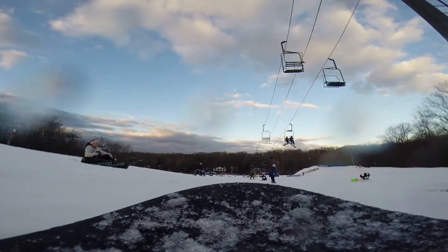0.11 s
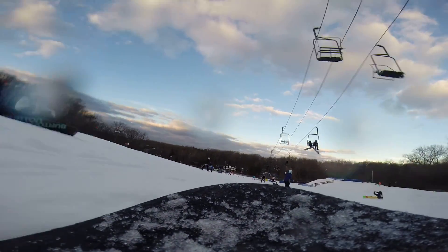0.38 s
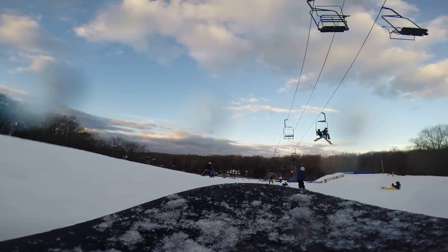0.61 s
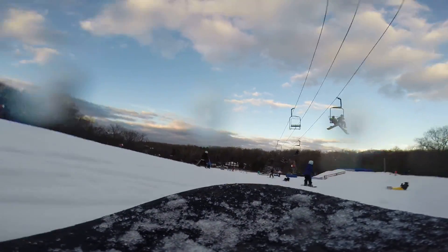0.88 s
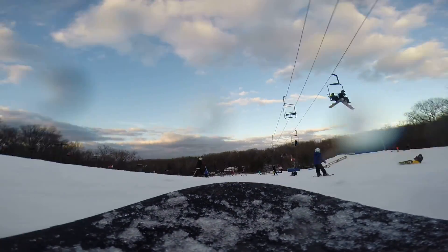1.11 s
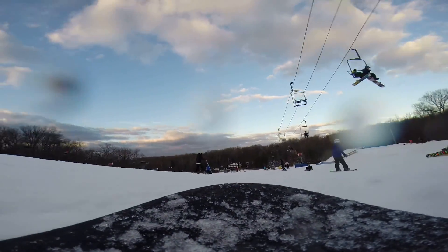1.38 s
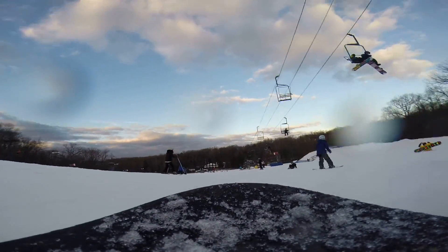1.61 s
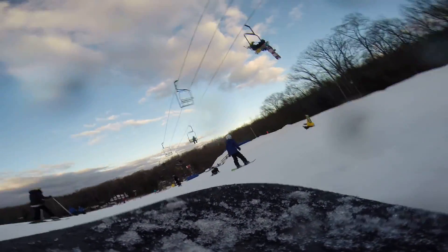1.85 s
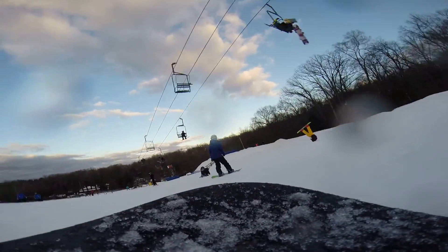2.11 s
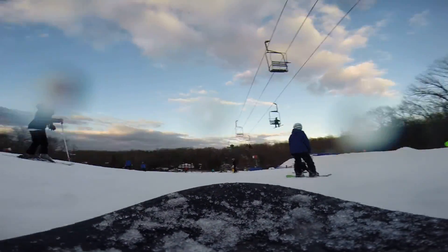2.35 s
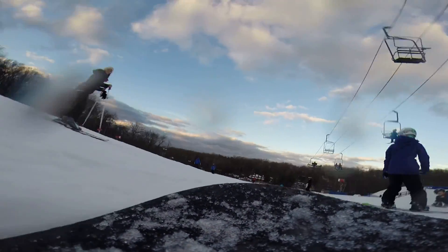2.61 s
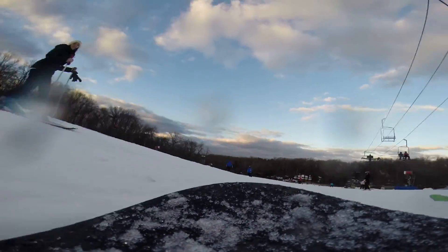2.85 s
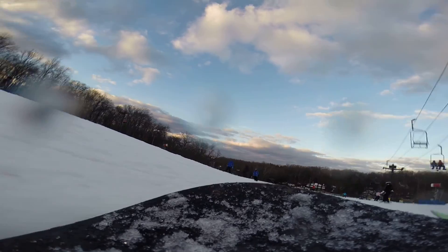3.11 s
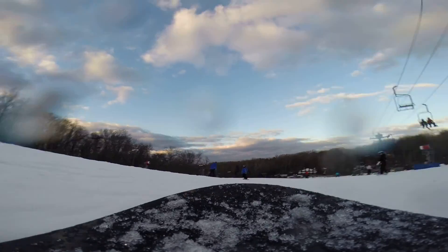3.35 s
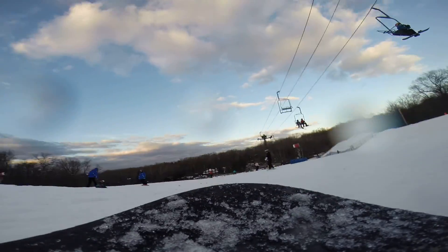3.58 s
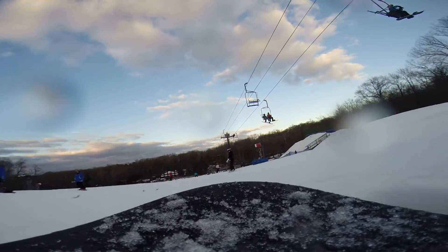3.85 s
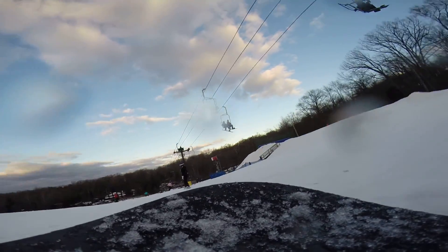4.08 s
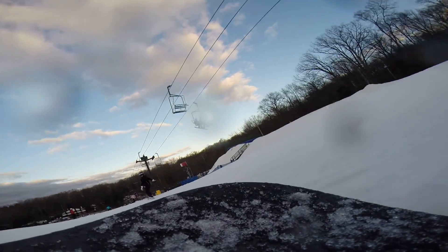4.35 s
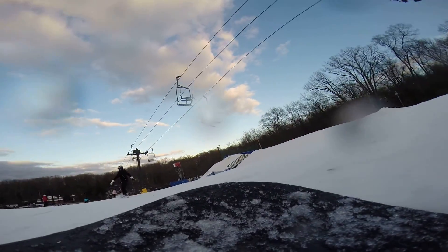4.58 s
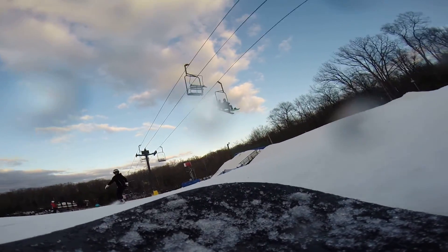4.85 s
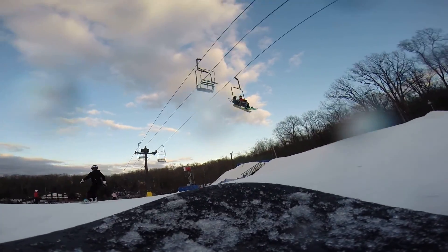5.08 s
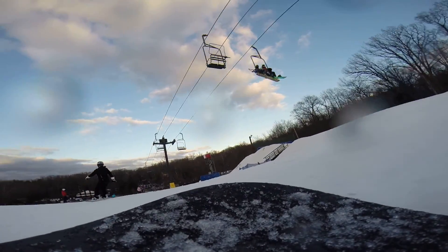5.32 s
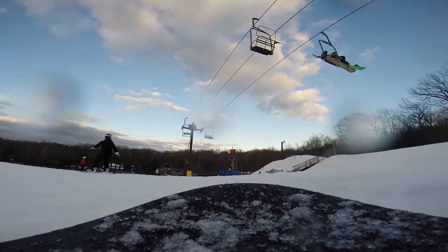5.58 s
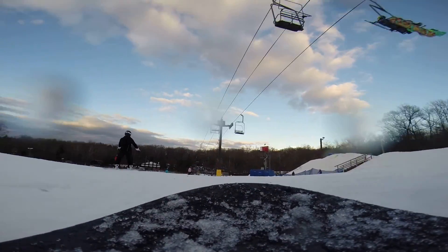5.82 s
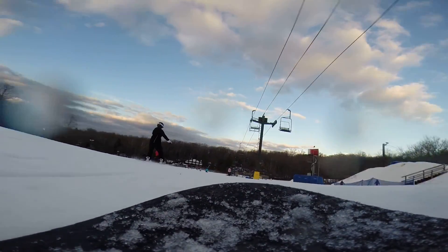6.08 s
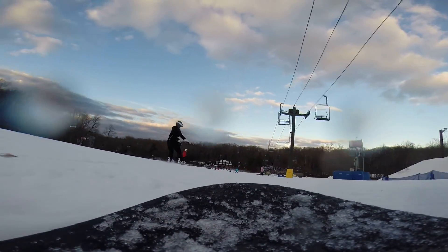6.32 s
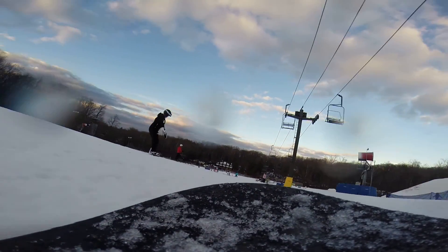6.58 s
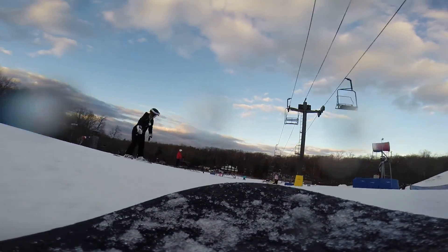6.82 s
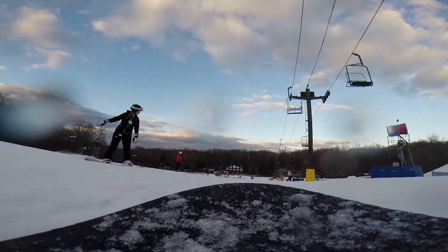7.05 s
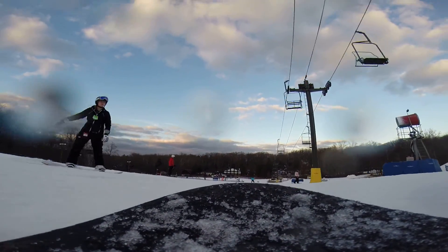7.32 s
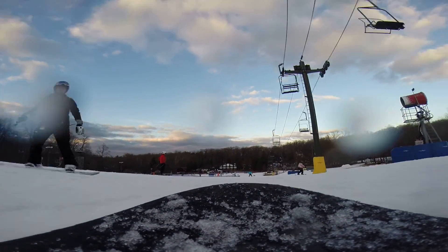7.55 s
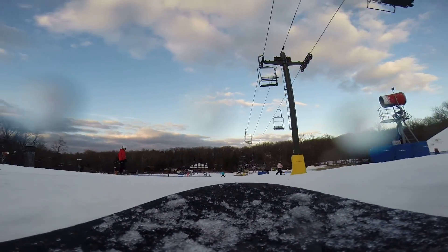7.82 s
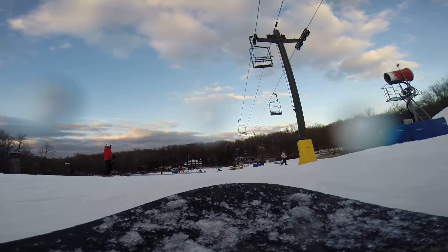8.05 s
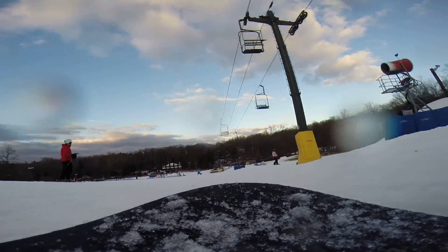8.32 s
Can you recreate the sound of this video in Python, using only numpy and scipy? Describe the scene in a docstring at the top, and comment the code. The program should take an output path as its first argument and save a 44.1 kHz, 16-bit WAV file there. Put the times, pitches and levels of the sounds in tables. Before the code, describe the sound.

Harsh, crunchy sliding on hard snow heard from the deck, fluttering constantly, with sharp ridge bumps and a low shuddering hum.

```python
"""A board slides over packed snow, heard by a small camera in a closed case fixed on its deck.
Dense random grains, coloured by the resonances of deck and case, make the scrape and a coarser low roar.
A bending mode hums near 100 Hz under noise and kicks; swelling sines are ridges and lumps, clicks are ice chips.
When the base lifts, the scrape sinks and its treble usually shifts, at times going dull.
Low noise gusts as wind, and a steady microphone hiss lies under it all."""
import sys
import numpy as np
from scipy import signal
from scipy.io import wavfile
from scipy.ndimage import uniform_filter1d

SR = 44100
rng = np.random.default_rng(int(sys.argv[2]) if len(sys.argv) > 2 else 0)


def transcribe(signal):
    """Save signal, clipped to [-1, 1], as a 16-bit WAV file at the path in sys.argv[1]."""
    frames = np.atleast_2d(signal).T
    limited = np.clip(frames, -1, 1)
    pcm = np.round(limited * 32767).astype(np.int16)
    wavfile.write(sys.argv[1], SR, pcm)


def how_loud(loudness_db):
    """Turn decibels into a plain amplitude multiplier (0 dB gives 1, 20 dB gives 10)."""
    steps = np.asarray(loudness_db, float) / 20
    return 10 ** steps


N = 371763  # samples

# Spectrum of the scrape before the body rings: f/Hz, relative density/dB per Hz
SCRAPE_SPECTRUM = [(650, -70), (1100, -17.5), (1500, -8.5), (2140, 1.5), (3520, -13.5), (5660, -24),
                   (6250, -23), (7630, -33), (11800, -46.5), (15500, -47)]
# Spectrum of the low roar before the body rings: f/Hz, relative density/dB per Hz
ROAR_SPECTRUM = [(76, -18), (130, -2.5), (298, -11), (491, -12.5), (584, -19), (682, -14), (780, -18.5),
                 (910, -11.5), (1090, -16.5), (1300, -6.5), (1690, -34), (2860, -120)]
# Resonances (+) and cancellations (-) of deck and case: f/Hz, width/Hz, gain/dB
BODY_MODES = [(203, 105, 4), (485, 210, 2.5), (630, 60, 0), (676, 53, 3.5), (788, 66, -4), (960, 190, 5),
              (1100, 294, -5.5), (1530, 338, 11.5), (1830, 100, -1.5), (2100, 525, 5.5), (2355, 80, -6.5),
              (3095, 114, -7), (3480, 200, -2), (4120, 94, 3.5), (4620, 670, -2), (5640, 230, -9.5),
              (5950, 1800, 4), (7280, 280, -4.5), (7830, 480, -10.5), (8500, 700, 2.5), (10420, 390, -9),
              (11630, 1550, 8), (13900, 900, 0), (15100, 900, -5)]
# The ride: t/s, bite of the edge as treble gain/dB, lean of the board as gain of the lower deck modes/dB
RIDE = [(0.0, 5.5, 3.5), (0.17, -2.5, -1.5), (0.38, 3, 2), (0.7, 3, -0.5), (0.92, 6.5, -0.5),
        (1.4, 4.5, -1), (1.8, 4.5, 3.5), (2.12, -4, 3), (2.33, 8.5, -4), (2.6, 0, 0), (3.3, 1, 2),
        (3.66, 5, 2.5), (4.0, 0, 4), (4.3, 2, 4.5), (4.72, -3.5, 8), (5.05, -1.5, 4.5), (5.2, 4.5, -1),
        (5.3, 1, 4), (5.47, -1.5, 7.5), (5.55, 8, 4), (5.66, 5.5, -1), (6.05, 5.5, -4.5), (6.55, 0.5, 2),
        (6.8, 1.5, -1.5), (7.3, 1, 3), (7.64, 7.5, -5), (7.75, 2.5, -7), (7.96, 3.5, 4), (8.25, 0, 5),
        (8.43, -4, 2)]
# The base comes off the snow: t of least contact/s, loss/dB, fading/s, return/s, further treble loss/dB
LIFTS = [(0.175, 3.5, .01, 0.19, -4.5), (0.47, 1.5, 0.041, 0.022, -2), (0.74, 3.5, 0.028, 0.026, 3),
         (0.84, 4, .02, 0.034, 0), (1.04, 6, 0.086, 0.037, 21), (1.3, 4, 0.065, 0.057, -1.5),
         (1.45, 2, 0.014, 0.068, 5), (1.56, 4.5, 0.027, 0.035, -2), (1.68, 3.5, 0.057, 0.025, -1.5),
         (2.18, 5, 0.043, .03, -6), (2.26, 5, 0.035, 0.1, -1), (2.62, 5.5, 0.027, 0.038, -4),
         (2.752, 3.5, 0.0066, .008, 0), (2.983, 3.5, 0.011, 0.0088, 1), (5.384, 5, 0.014, 0.0091, 0),
         (3.538, 11.5, 0.071, 0.025, 6), (3.85, 4.5, 0.042, 0.015, 2), (4.02, 2.5, 0.014, 0.13, -3),
         (4.165, 4.5, 0.01, 0.022, -5), (5.04, 4, 0.024, 0.04, 3), (5.11, 1.5, 0.014, 0.025, 0),
         (5.55, 5, 0.08, 0.051, 1), (5.85, 6, 0.0095, 0.1, -2.5), (6.56, 3.5, 0.028, 0.14, 0),
         (7.05, 2.5, 0.056, 0.034, -4), (7.725, 1.5, 0.02, 0.013, -1), (7.501, 9.5, 0.077, 0.028, 2),
         (7.83, 6, 0.04, 0.011, 10), (7.89, 2.5, 0.014, 0.057, -5), (8.03, 1.5, 0.012, 0.013, 4),
         (8.08, 6.5, 0.02, 0.03, 0), (8.14, 5.5, 0.022, 0.022, -1), (8.225, 11.5, 0.0072, 0.0082, -1),
         (8.272, 4, 0.0083, 0.051, 5), (8.375, 6, 0.015, .03, -2)]
# The base digs in (a negative gain eases off): t/s, length/s, gain/dB
DIGS = [(0.103, 0.023, 1), (0.525, 0.019, 4.5), (0.636, 0.037, -1.5), (0.88, 0.076, 2), (1.166, 0.019, 7.5),
        (1.21, 0.017, 0.5), (1.408, 0.051, 1.5), (1.515, 0.033, 7), (1.62, 0.033, 2.5), (2.297, 0.032, 4),
        (2.359, 0.021, 4.5), (2.495, 0.021, 4.5), (2.577, 0.0093, 9), (2.891, 0.028, 6), (3.088, 0.048, 2),
        (3.336, 0.027, 4), (3.576, 0.026, 3), (3.723, .04, 3.5), (3.99, .04, 3), (4.253, 0.043, 3.5),
        (4.694, .04, -0.5), (5.46, .03, -3), (5.638, 0.045, 2), (5.735, 0.025, 8), (5.83, 0.041, 6.5),
        (5.96, 0.022, 4), (6.047, .04, 3), (6.52, 0.027, 1.5), (6.834, 0.071, 3), (7.102, 0.037, 4.5),
        (7.616, 0.039, 1), (8.003, 0.018, 2.5), (8.116, 0.014, 0), (8.177, 0.017, 2), (8.212, 0.018, 5)]
# Rough patches that shake the deck: t/s, length/s, flex hum gain/dB, low roar gain/dB
ROUGH_PATCHES = [(0.0, 0.032, 17, -4), (0.147, 0.044, -3, 1), (0.155, 0.015, -2, 5.5),
                 (0.413, 0.16, 5, 0.5), (0.59, 0.1, 12, -3), (1.112, 0.073, -6, -0.5),
                 (1.413, 0.048, 11, 4), (1.504, 0.041, 10.5, 5), (1.662, 0.066, 9, -9),
                 (1.857, 0.071, 9, 6), (1.971, 0.056, 17.5, 1.5), (2.122, 0.23, 9.5, 4.5),
                 (2.224, 0.015, -2, 5), (2.252, 0.26, 6.5, -1.5), (2.417, 0.09, 12.5, 1.5),
                 (2.572, .06, 4, 2), (2.75, 0.23, 4, 1), (2.767, .02, 8, -2), (3.014, 0.33, 4, 1.5),
                 (3.187, 0.2, 6, 2), (3.342, 0.058, -5, 4), (3.586, 0.33, 9.5, -0.5), (3.945, 0.44, 1.5, 3),
                 (4.108, 0.12, 13, -1), (4.264, 0.16, 7.5, 4), (4.545, 0.057, -17, 5.5),
                 (4.634, 0.27, 8.5, 1.5), (4.933, 0.1, 8, 5.5), (5.18, 0.26, 10, 2.5), (5.306, 0.081, 1, 3),
                 (5.466, 0.28, 9, 1), (5.653, 0.045, 3, 1), (5.726, 0.055, 12, -1), (5.864, 0.063, 9, -0.5),
                 (5.945, 0.14, 1.5, -5), (6.083, 0.071, 12.5, 2), (6.237, 0.11, 6, 0.5),
                 (6.375, 0.17, 4, 4), (6.494, 0.078, 2, 4.5), (6.694, 0.15, 6, 2.5),
                 (6.862, 0.053, 13, 4.5), (6.973, 0.04, -2, 6), (7.296, 0.12, 9.5, 3),
                 (7.45, 0.16, -4, -3.5), (7.61, 0.2, 13, 2), (7.794, 0.12, 8.5, 6), (7.927, 0.061, 12, -5),
                 (8.115, 0.026, -5, 3), (8.29, 0.31, 9.5, 2.5)]
# Bumps that kick the bending mode: t/s, kick/dB
BUMPS = [(0.425, -20.5), (0.571, -10), (0.819, -21), (1.106, -19), (1.728, -26), (1.819, -15), (1.895, -17),
         (2.03, -12.5), (2.272, -12), (2.545, -20), (2.76, -15), (2.966, -17), (3.195, -10.5), (3.365, -16),
         (3.575, -14), (4.004, -15), (4.904, -17), (5.309, -10.5), (5.451, -15), (5.701, -13), (6.467, -14),
         (6.852, -20), (6.969, -17), (7.298, -14), (7.587, -21), (7.744, -13), (7.907, -24), (8.11, -22)]
# Wind gusts: t/s, length/s, gain over the calm/dB
GUSTS = [(0.15, 0.22, 5), (0.655, 0.99, 9.5), (1.144, 0.12, 10), (1.47, 0.27, 12), (1.948, 0.33, 17),
         (2.596, 0.4, 11.5), (2.778, .12, 8), (3, 0.19, 18), (3.364, 0.28, 11), (3.595, 0.23, 9),
         (3.9, .3, 8), (4.222, 0.28, 11), (4.7, .25, 11), (5.152, 0.38, 6), (5.65, 0.29, 8),
         (6.226, 0.14, 15), (6.476, 0.12, 16), (6.737, 0.37, 12), (6.98, 0.091, 20), (7.282, 0.15, 11),
         (7.62, 0.26, 4), (8.233, 0.32, 5)]
# Hard ridges: t of onset/s, level/dB, ring f/Hz, rise/s
RIDGES = [(0.1521, -4.5, 2110, 0.0056), (0.4115, -3, 2095, 0.0036), (0.096, -3, 2200, 0.002),
          (0.96, -6, 1980, 0.002), (1.0933, -2.5, 2070, 0.0029), (1.5035, -9, 1530, 0.0027),
          (1.712, -12, 1730, 0.0062), (2.2215, -6, 1616, 0.0032), (2.7325, -7, 1520, 0.0059),
          (2.8739, -2, 2045, 0.0027), (3.549, -8, 1990, 0.0037), (3.8067, -16, 1640, 0.0034),
          (3.828, -6, 1650, 0.0038), (3.9577, -9, 1650, 0.0031), (3.981, -6, 2080, 0.0026),
          (4.145, -5, 1515, 0.0054), (4.1845, -9, 1540, 0.0058), (5.24, -16, 1530, 0.0054),
          (5.462, -7, 1696, 0.005), (5.583, -4, 1680, 0.0025), (5.6954, -13, 1530, 0.0045),
          (5.7855, -8, 1610, 0.0042), (5.8256, -5.5, 1660, 0.005), (6.0055, -2.5, 2200, 0.0022),
          (6.127, -2, 2240, 0.0017), (7.3266, -1, 1540, 0.0035), (7.6605, -2.5, 2270, 0.006),
          (7.796, -1.5, 1530, 0.0027), (7.855, -2, 1650, 0.0045), (7.9184, -9, 2180, 0.0039),
          (8.0495, -2.5, 1560, 0.002), (8.108, -3.5, 1536, 0.0043), (8.173, -4, 2160, 0.0036),
          (8.203, -8, 1610, 0.0045), (8.2502, -2, 2133, 0.0049), (8.343, -7, 1594, 0.0048),
          (8.4128, -8, 1580, 0.0047)]
# Lumps of snow that knock the deck: t of peak/s, level/dB, ring f/Hz
KNOCKS = [(0.154, -5, 1390), (0.511, -16, 1430), (1.395, -18, 188), (1.408, -18, 1100), (1.644, -17, 160),
          (1.861, -15, 1370), (1.959, -17, 170), (1.995, -16, 180), (2.124, -22, 180), (2.224, -16, 1300),
          (2.771, -19, 210), (3.013, -20, 180), (3.152, -15, 160), (3.624, -19, 192), (3.777, -17, 1410),
          (4.145, -22, 200), (4.213, -22, 170), (4.434, -19, 1160), (4.927, -17, 1030), (5.322, -21, 960),
          (5.414, -20.5, 260), (6.97, -24, 200), (7.307, -27, 163.4), (7.599, -26, 150), (7.655, -31, 140),
          (7.753, -23, 240), (7.801, -19, 212), (8.003, -14, 1350), (8.345, -18, 1000), (8.422, -12, 1410)]
# Ice chips on the case: t/s, strength before filtering/dB
ICE_TICKS = [(1.9533, -12), (1.9547, -6), (2.7600, -9), (2.7659, 1), (3.0109, 3)]

SCRAPE_DB, SCRAPE_SWAY_DB = -14.5, 0.2
BITE_FROM_HZ, BITE_FULL_HZ = 2170, 8450  # the bite starts to act, acts fully
UPPER_FOLLOWS, UPPER_DB = 0.45, -3.0  # the upper deck modes take this share of the lean, plus a fixed gain
TREBLE_STEADY = 0.37  # share of each change of contact that the treble does not follow
DULL_SHARE = 0.69  # the treble changes over this share of the fading time
HUM_DB, ROAR_DB = -31.5, -29.5  # between the rough patches
HUM_FOLLOWS, ROAR_FOLLOWS = 0.33, 0.54  # share of each change of contact
FLEX_HZ, FLEX_WIDTH_HZ = 100.4, 10
CALM_DB = -39  # wind between gusts
HISS_DB, HISS_FROM_HZ = -66.0, 9000
CRUNCH_DB, CRUNCH_RISE_S, CRUNCH_FALL_S = 3, 0.0054, 0.004  # what a ridge of 0 dB adds to the chatter
KNOCK_S_AT_1_KHZ = 0.0023  # half length of a knock; deeper ones last longer


def rms_one(x):
    """Scale to unit power."""
    return x / np.sqrt(np.mean(x ** 2) + 1e-20)


def in_time(rows):
    """Draw the columns of a table as curves, one value per sample."""
    s, *columns = np.transpose(rows)
    return [np.interp(np.arange(N) / SR, s, column) for column in columns]


def bells(s, before, after, heights):
    """Sum of bell-shaped rises and falls, one per event, worked out every millisecond."""
    grid = np.arange(0, N / SR + 0.001, 0.001)
    apart = grid[:, None] - s
    width = np.maximum(np.where(apart < 0, before, after), 0.004)
    shape = np.exp(-(apart / width) ** 2)
    return np.interp(np.arange(N) / SR, grid, shape @ heights)


def drift(rate_hz):
    """Slow random wander of spread 1: noise through two equal low-pass poles at a twentieth of SR."""
    r = np.exp(-40 * np.pi * rate_hz / SR)
    noise = rng.standard_normal(N // 20 + 3002)
    slow = signal.lfilter([1], [1, -2 * r, r * r], noise)[3000:]  # skip the settling
    return np.interp(np.arange(N) / 20, np.arange(len(slow)), rms_one(slow))


def grains(per_s, spread_db):
    """Crystals break at random moments with uneven force."""
    force = how_loud(spread_db * np.minimum(rng.exponential(1, N), 5))
    signed = force * rng.choice([-1, 1], N)
    return rms_one(signed * (rng.random(N) < per_s / SR))


def bands(spectrum, source, patchy_db, gain_db):
    """Third-octave bank: each band has its level, a flicker (less in the treble) and a gain set by its pitch."""
    hz_points, db_points = np.transpose(spectrum)
    edges = 20 * 2 ** (np.arange(30) / 3)
    out = np.zeros(N)
    for k, (low, high) in enumerate(zip(edges, edges[1:])):
        hz = np.sqrt(low * high)
        if hz_points[0] * 0.9 < hz < hz_points[-1] * 1.1:
            level_db = np.interp(np.log(hz), np.log(hz_points), db_points)
            flicker_db = patchy_db * min(1, 5000 / hz) * drift(6.4)
            sos = signal.butter(2, [low, high], "band", fs=SR, output="sos")
            band = signal.sosfilt(sos, source[k % 2])  # neighbours use different grains
            out += how_loud(level_db + gain_db(hz) + flicker_db) * band
    return out


def body(x):
    """Deck and case ring and cancel: a chain of peak and notch filters."""
    for hz, width_hz, db in BODY_MODES:
        w, a = 2 * np.pi * hz / SR, how_loud(db / 2)
        q = np.sin(w) * width_hz / hz / 2
        zeros = [1 + q * a, -2 * np.cos(w), 1 - q * a]
        poles = [1 + q / a, -2 * np.cos(w), 1 - q / a]
        x = signal.lfilter(zeros, poles, x)
    return x


def contact():
    """Change of level and of treble/dB as the base digs in or comes off the snow."""
    s, loss_db, fading, back, treble_db = np.transpose(LIFTS)
    dig_s, length, gain_db = np.transpose(DIGS)
    dig_db = bells(dig_s, length / 2, length / 2, gain_db)
    level_db = dig_db - bells(s, fading, back, loss_db)
    return level_db, -bells(s, DULL_SHARE * fading, back, treble_db)


def shaking():
    """Gain/dB of flex hum and low roar over rough patches."""
    s, length, hum_db, roar_db = np.transpose(ROUGH_PATCHES)
    return bells(s, length / 2, length / 2, hum_db), bells(s, length / 2, length / 2, roar_db)


def scrape(chatter_db):
    """Dense grains under the base; bite lifts the treble, the lean shifts weight between deck modes."""
    bite_db, lean_db = in_time(RIDE)
    level_db, dull_db = contact()
    treble_db = bite_db + dull_db - TREBLE_STEADY * level_db

    def colour_db(hz):
        """Gain of one band over time."""
        share = np.log2(hz / BITE_FROM_HZ) / np.log2(BITE_FULL_HZ / BITE_FROM_HZ)
        tilt = treble_db * np.clip(share, 0, 1)
        lower = lean_db * np.exp(-(np.log2(hz / 1400) / 0.25) ** 2)
        upper = (UPPER_DB + UPPER_FOLLOWS * lean_db) * np.exp(-(np.log2(hz / 5000) / 0.22) ** 2)
        return tilt + lower + upper

    source = [grains(9000, 2.8), grains(9000, 1.5)]
    rung = rms_one(body(bands(SCRAPE_SPECTRUM, source, 1.18, colour_db)))
    return how_loud(SCRAPE_DB + level_db + SCRAPE_SWAY_DB * drift(17.0) + chatter_db) * rung


def roar(chatter_db):
    """Coarser lumps shake the whole deck in its low range."""
    source = [grains(3000, 1.85), grains(3000, 2.4)]
    lean_db = in_time(RIDE)[1]

    def hollow_db(hz):
        """Leaning also opens the hollow mode near 1 kHz."""
        return 0.38 * lean_db * np.exp(-(np.log2(hz / 950) / 1.3) ** 2)

    shaken = rms_one(body(bands(ROAR_SPECTRUM, source, 1.0, hollow_db)))
    return how_loud(ROAR_DB + shaking()[1] + ROAR_FOLLOWS * contact()[0] + chatter_db) * shaken


def flex():
    """The bending mode, a two-pole resonator, is kept going by the rough snow and kicked by bumps."""
    r, w = np.exp(-np.pi * FLEX_WIDTH_HZ / SR), 2 * np.pi * FLEX_HZ / SR
    poles = [1, -2 * r * np.cos(w), r * r]
    around_mode = signal.butter(1, [70, 140], "band", fs=SR, output="sos")
    rough = signal.sosfilt(around_mode, grains(400, 1.2))
    hum = rms_one(signal.lfilter([1, 0, -1], poles, rough))
    power = uniform_filter1d(hum ** 2, size=1500)
    hum = rms_one(hum / (power + 0.057) ** 0.2)  # its own swings in level are partly evened out
    hum_db = HUM_DB + shaking()[0] + HUM_FOLLOWS * contact()[0]
    kicks = np.full(N, 1e-18)
    kicks[[round(s * SR) for s, db in BUMPS]] = how_loud(np.array(BUMPS)[:, 1])
    soft_kicks = signal.sosfilt(signal.butter(2, 260, fs=SR, output="sos"), kicks)
    return how_loud(hum_db) * hum + signal.lfilter([0.5, 0, -0.5], poles, soft_kicks)


def wind():
    """Lumpy gusts on the case: noise held below the flex mode, swelling in bells."""
    low_band = signal.butter(1, [58, 85], "band", fs=SR, output="sos")
    low = signal.sosfilt(low_band, rng.standard_normal(N))
    low = signal.sosfilt(signal.butter(2, 95, fs=SR, output="sos"), low)
    s, length, gust_db = np.transpose(GUSTS)
    return how_loud(CALM_DB + bells(s, length / 2, length / 2, gust_db)) * rms_one(low)


def microphone_hiss(shape):
    """Steady high-passed noise of the microphone."""
    treble = signal.butter(2, HISS_FROM_HZ, "high", fs=SR, output="sos")
    return how_loud(HISS_DB) * rms_one(signal.sosfilt(treble, rng.standard_normal(shape)))


def ridges():
    """The base rides up each ridge, a deck mode swells for a few milliseconds and is damped as it drops off."""
    out, t = np.zeros(N + 900), np.arange(900) / SR
    for (s, db, hz, rise), turn in zip(RIDGES, rng.random((len(RIDGES), 2))):
        rise = np.clip(rise, 0.002, 0.008)
        shape = np.exp(-((t - rise) / np.where(t < rise, 0.75 * rise, 0.003)) ** 2)
        mode = np.sin(2 * np.pi * (hz * t + turn[0]))
        overtone = 0.23 * np.sin(2 * np.pi * (1.3 * hz * t + turn[1]))
        at = round(s * SR)
        out[at:at + 900] += how_loud(db) * shape * (mode + overtone) / 1.4
    return out[:N]


def knocks():
    """Each lump sets a deck mode swelling and dying within a few cycles."""
    out, t = np.zeros(N + 2000), (np.arange(2000) - 1000) / SR
    for (s, db, hz), turn in zip(KNOCKS, rng.random((len(KNOCKS), 1))):
        half_s = KNOCK_S_AT_1_KHZ * np.sqrt(1000 / hz)
        shape = np.exp(-(t / half_s) ** 2)
        at = round(s * SR) - 1000  # the swell starts ahead of its peak
        out[at:at + 2000] += how_loud(db) * shape * np.sin(2 * np.pi * (hz * t + turn))
    return out[:N]


def ice_ticks():
    """Tiny bright clicks through the case: one sharp edge and a noisy rattle that decays in 0.8 ms."""
    out, t = np.full(N, 1e-18), np.arange(60) / SR
    for (s, db), noise in zip(ICE_TICKS, rng.choice([-1, 1], (len(ICE_TICKS), 60))):
        at = round(s * SR)
        rattle = 0.16 * noise * np.exp(-t / 0.0008)
        out[at:at + 60] += how_loud(db) * ((t == 0) + rattle)
    out = signal.sosfilt(signal.butter(1, 4500, fs=SR, output="sos"), out)
    return body(signal.sosfilt(signal.butter(3, 5200, "high", fs=SR, output="sos"), out))


def limiter(x, threshold_db, release_db_per_s):
    """Loud peaks pull the gain down within milliseconds; it creeps back slowly."""
    ramp = release_db_per_s * np.arange(N) / SR
    over_db = np.maximum(20 * np.log10(np.abs(x) + 1e-9) - threshold_db, 0)
    held_db = np.maximum.accumulate(over_db + ramp, axis=-1) - ramp
    r = np.exp(-1 / (0.002 * SR))
    return x * how_loud(-signal.lfilter([1 - r], [1, -r], held_db))


def scene():
    """All layers; scrape and roar share a fast chatter of the base on the snow, with a crunch at each ridge."""
    s, db, hz, rise = np.transpose(RIDGES)
    crunch_db = bells(s + rise, CRUNCH_RISE_S, CRUNCH_FALL_S, CRUNCH_DB * how_loud(db))
    chatter_db = 0.83 * drift(32.0) + 0.48 * drift(80.0) + crunch_db
    sliding = scrape(chatter_db) + roar(1.73 * chatter_db) + flex()
    return (sliding + wind() + ridges() + knocks() + ice_ticks())[None]


def roll_off(x):
    """The treble ends steeply here."""
    return signal.sosfilt(signal.butter(12, 15700, fs=SR, output="sos"), x)


def record(dry):
    """Microphone hiss, a limiter, rounded peaks and a steep shelf at the top."""
    noisy = dry + microphone_hiss(dry.shape)
    held = limiter(noisy, threshold_db=-3.0, release_db_per_s=90.0)
    rounded = held / (1 + (held / 0.98) ** 6) ** (1 / 6)
    shelf = signal.cheby2(14, 20, 15300, fs=SR, output="sos")  # 20 dB down from 15.3 kHz
    return roll_off(signal.sosfilt(shelf, rounded))


dry = scene()
out = record(dry)
transcribe(out)
```